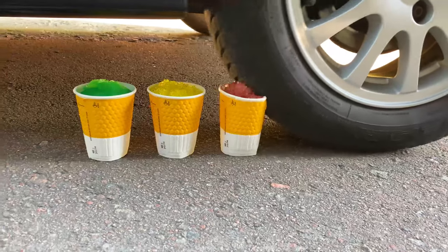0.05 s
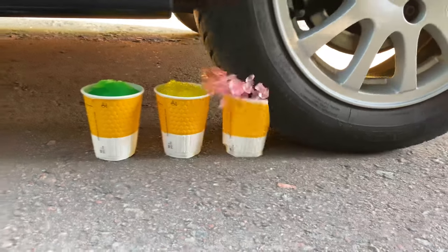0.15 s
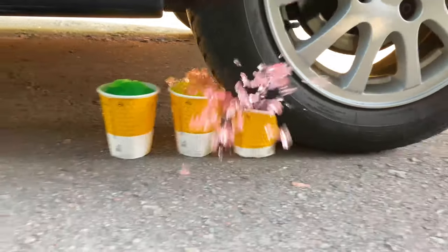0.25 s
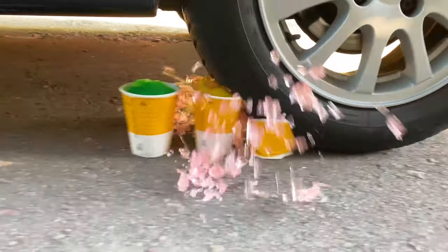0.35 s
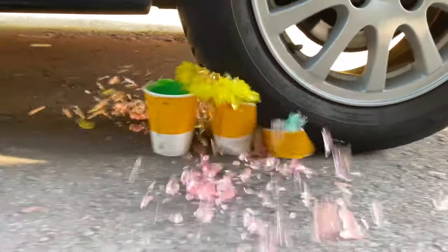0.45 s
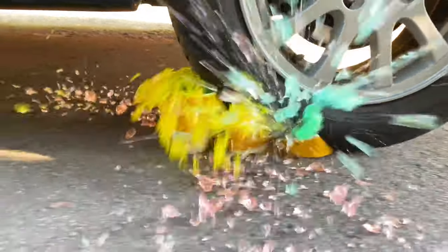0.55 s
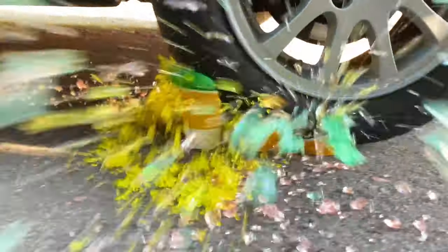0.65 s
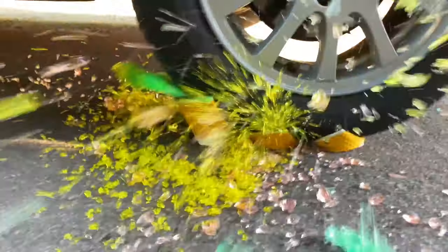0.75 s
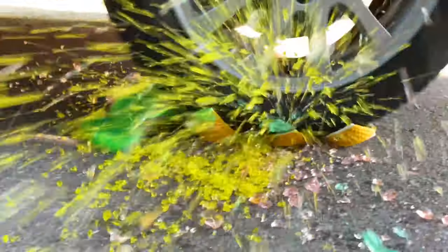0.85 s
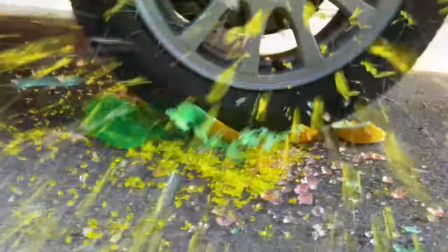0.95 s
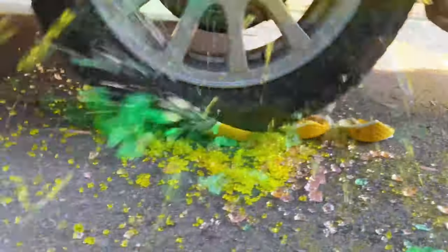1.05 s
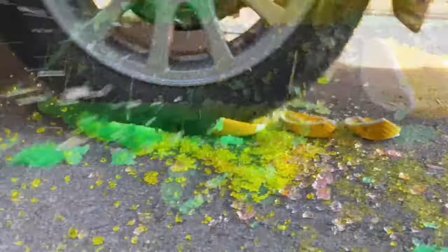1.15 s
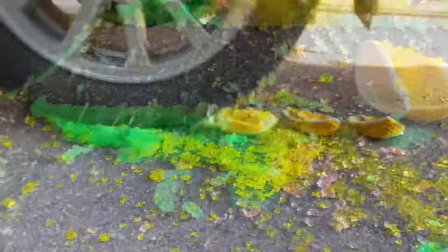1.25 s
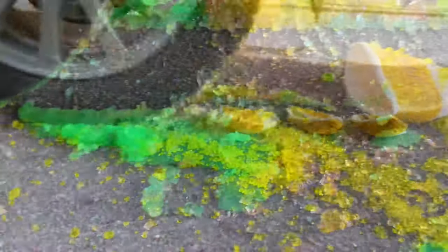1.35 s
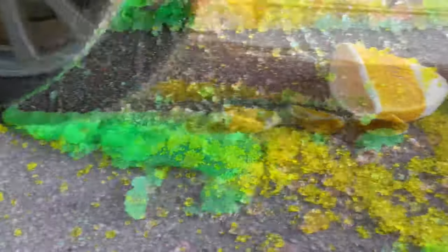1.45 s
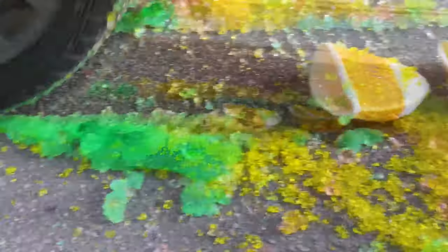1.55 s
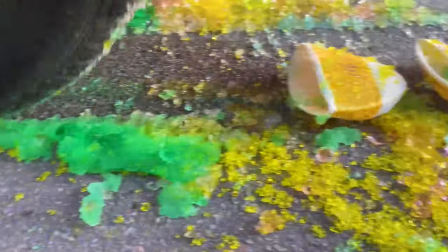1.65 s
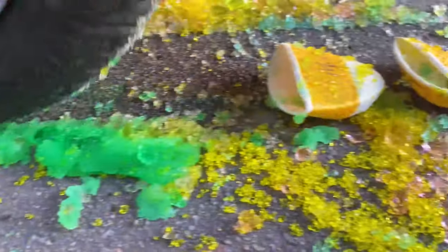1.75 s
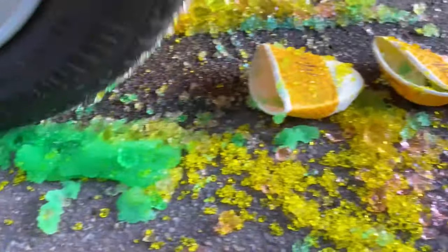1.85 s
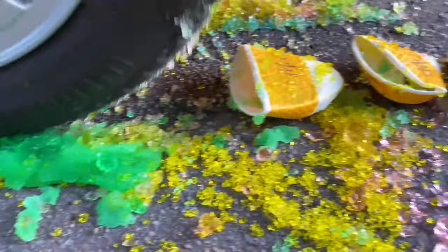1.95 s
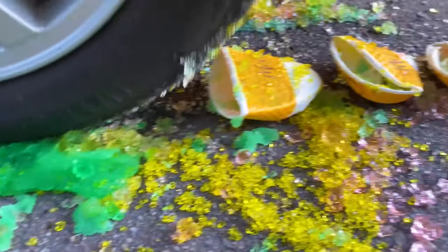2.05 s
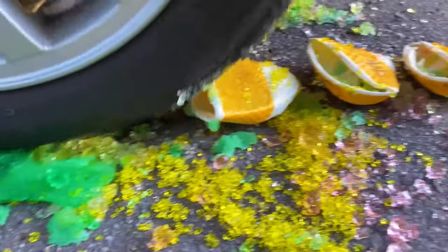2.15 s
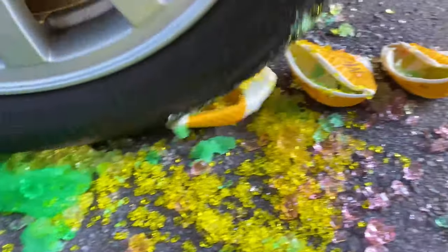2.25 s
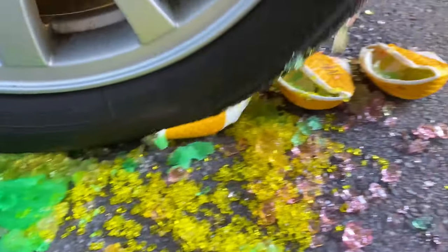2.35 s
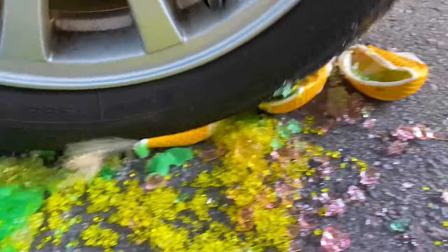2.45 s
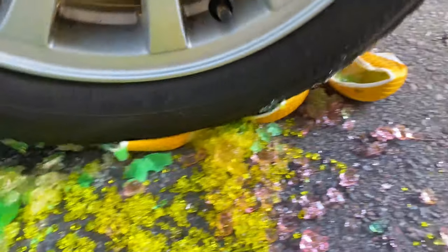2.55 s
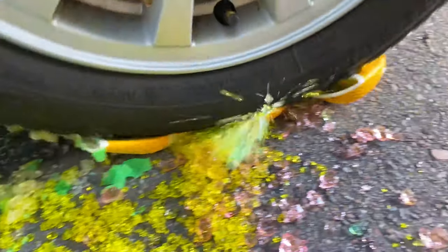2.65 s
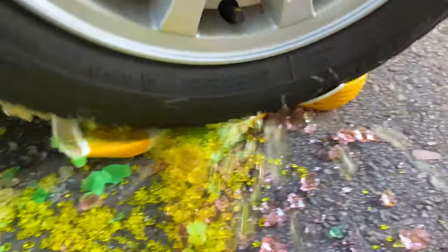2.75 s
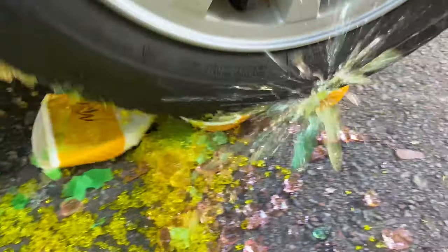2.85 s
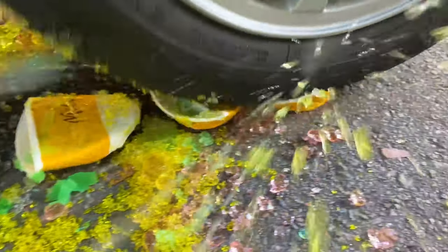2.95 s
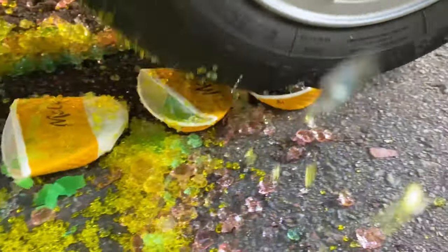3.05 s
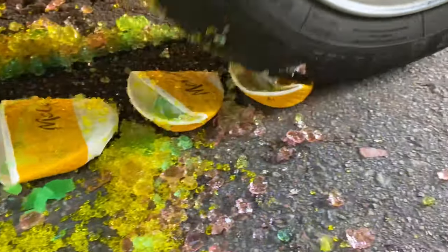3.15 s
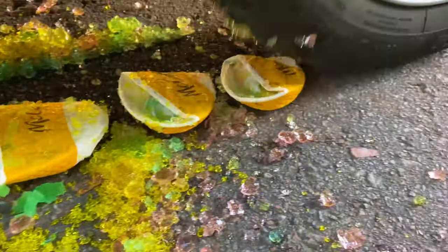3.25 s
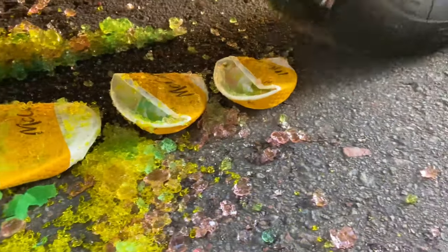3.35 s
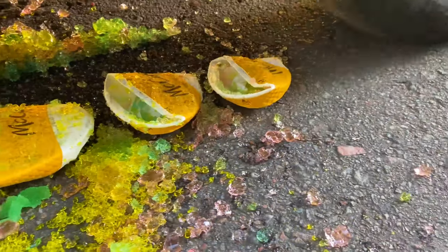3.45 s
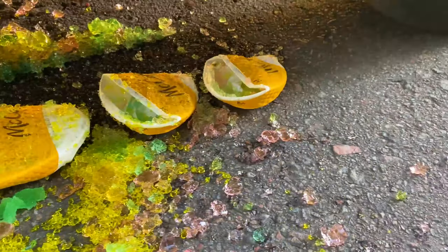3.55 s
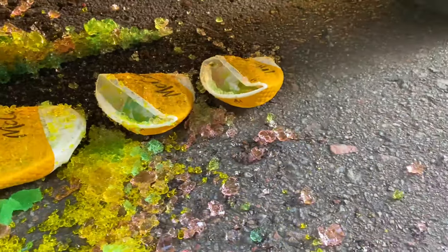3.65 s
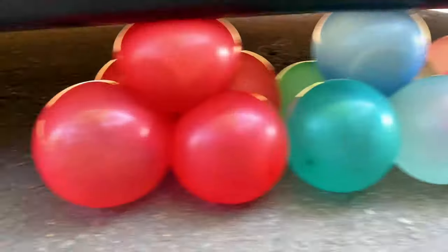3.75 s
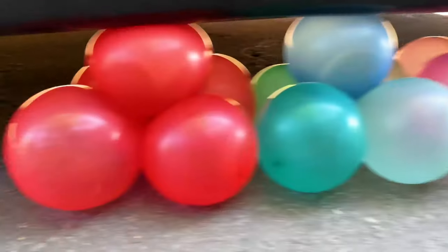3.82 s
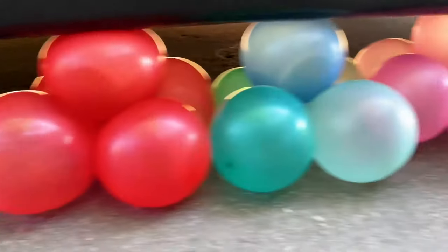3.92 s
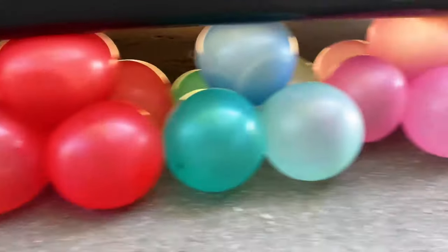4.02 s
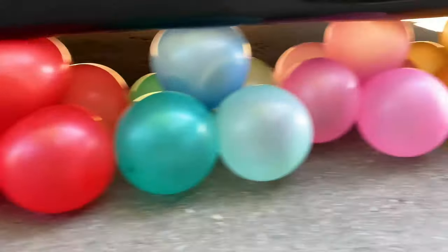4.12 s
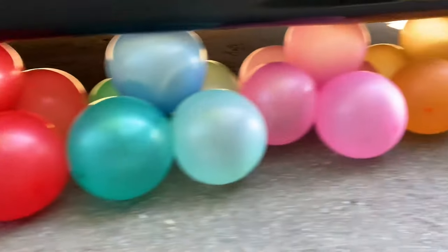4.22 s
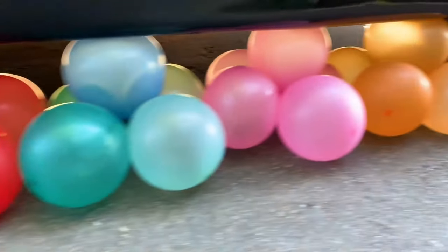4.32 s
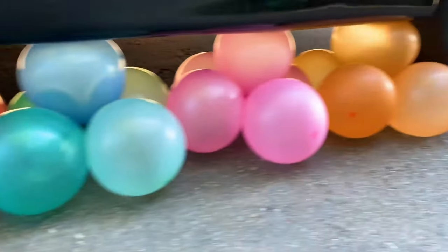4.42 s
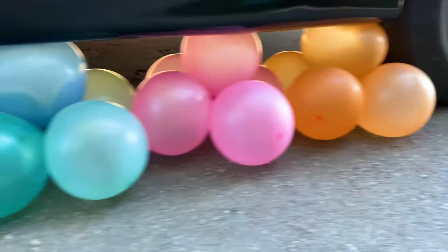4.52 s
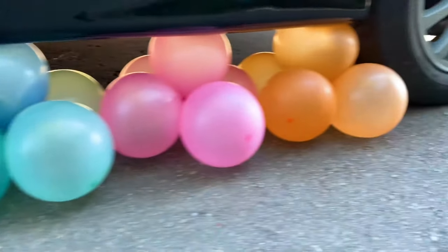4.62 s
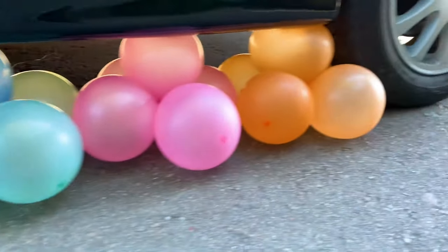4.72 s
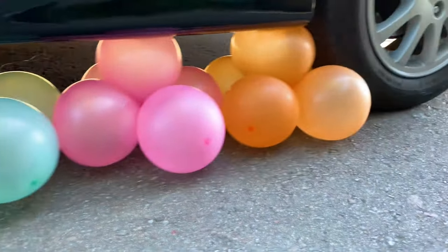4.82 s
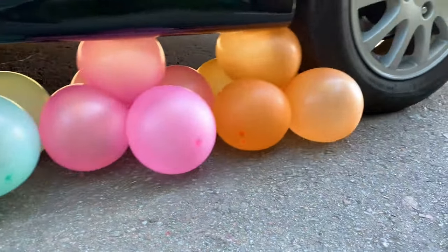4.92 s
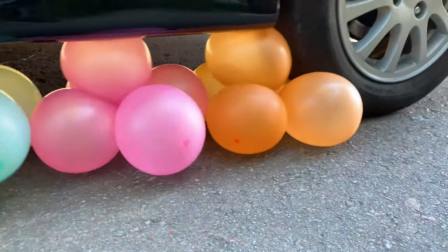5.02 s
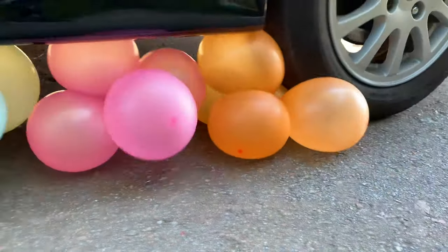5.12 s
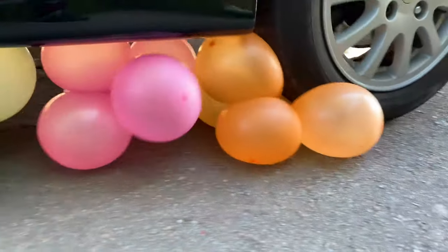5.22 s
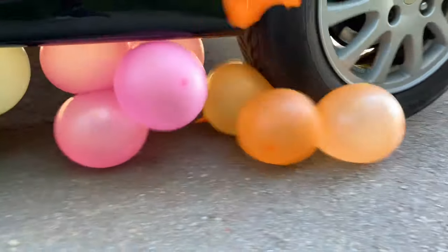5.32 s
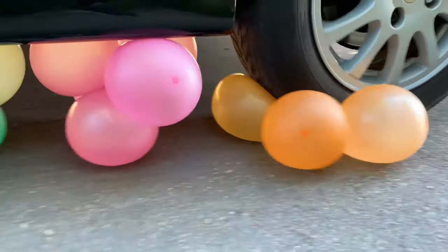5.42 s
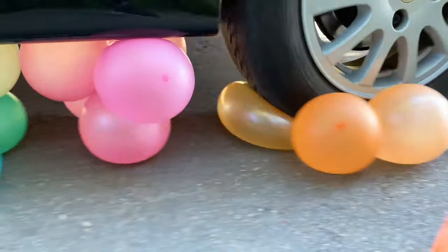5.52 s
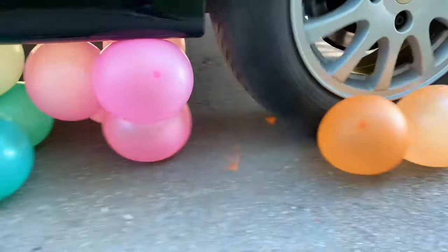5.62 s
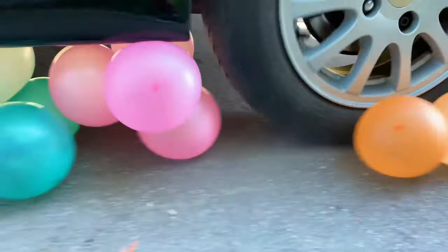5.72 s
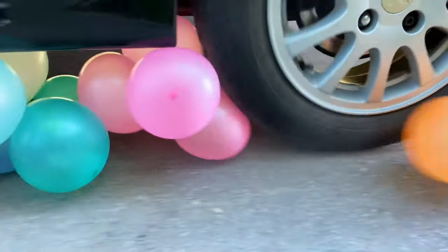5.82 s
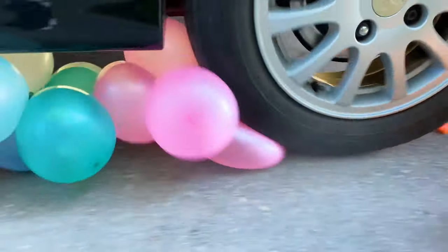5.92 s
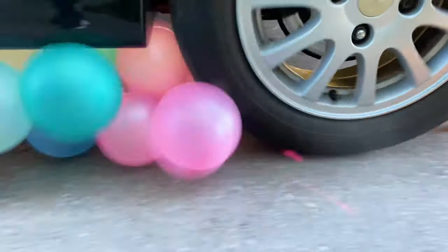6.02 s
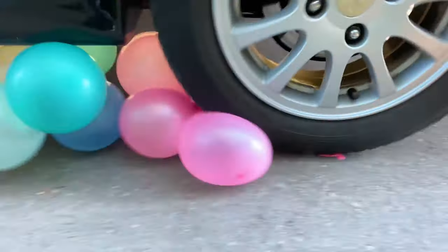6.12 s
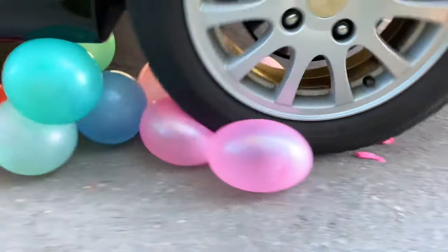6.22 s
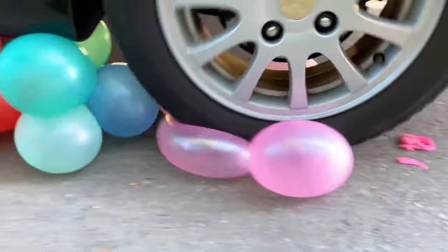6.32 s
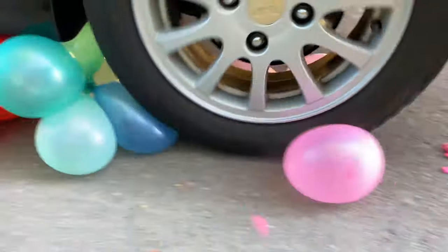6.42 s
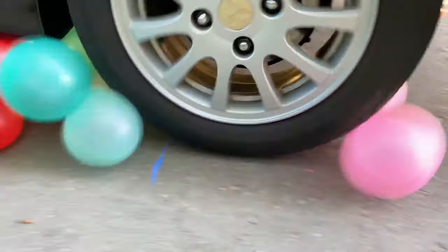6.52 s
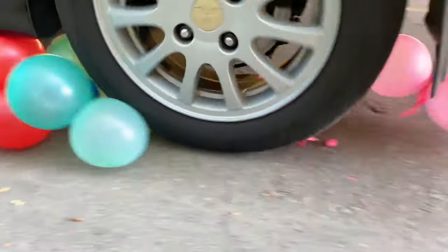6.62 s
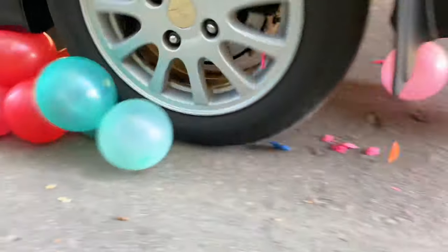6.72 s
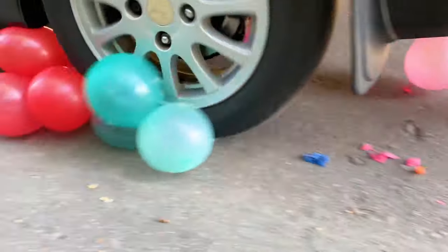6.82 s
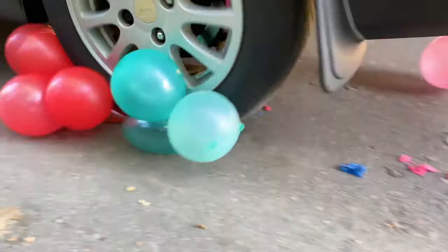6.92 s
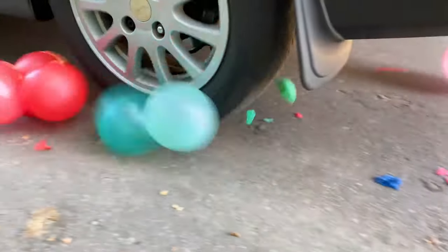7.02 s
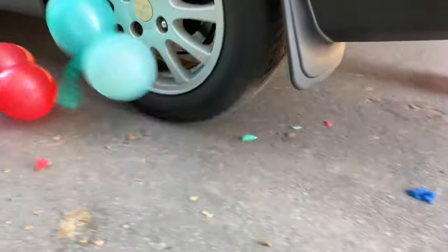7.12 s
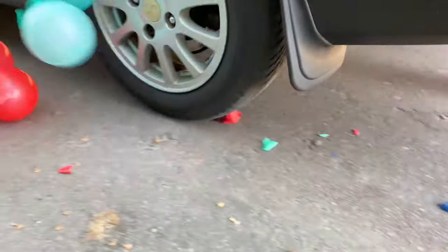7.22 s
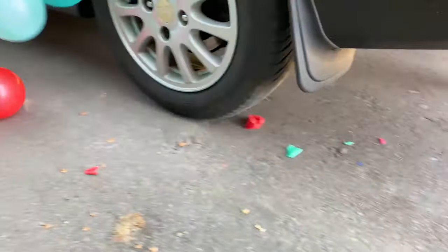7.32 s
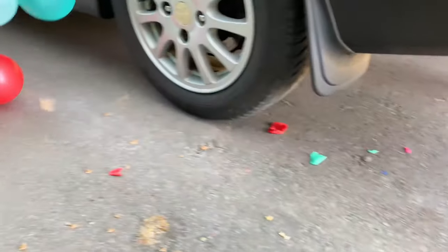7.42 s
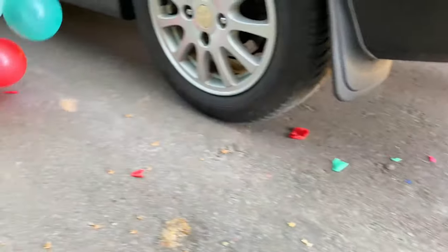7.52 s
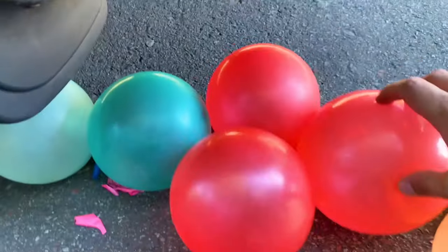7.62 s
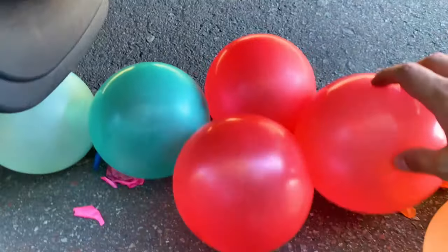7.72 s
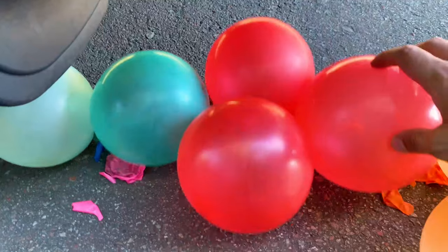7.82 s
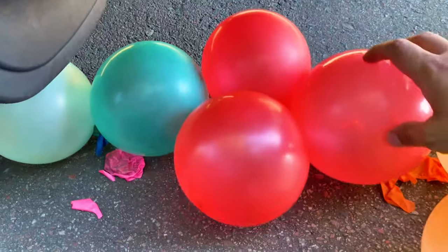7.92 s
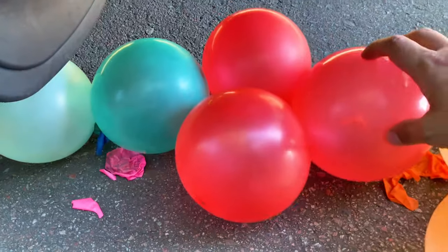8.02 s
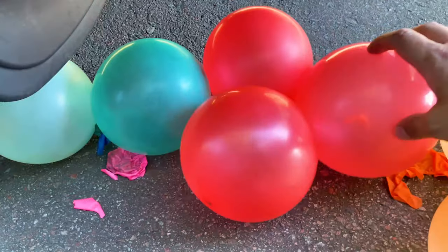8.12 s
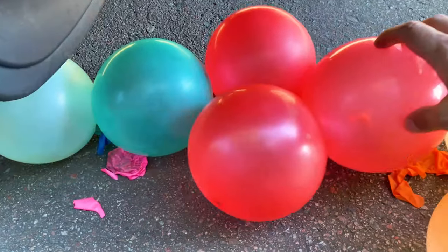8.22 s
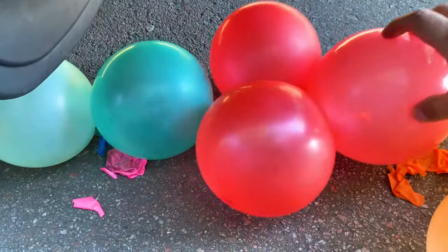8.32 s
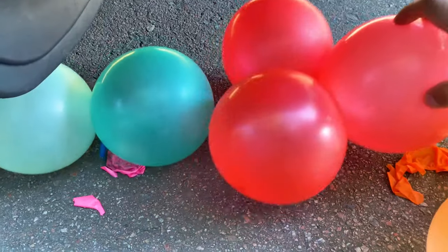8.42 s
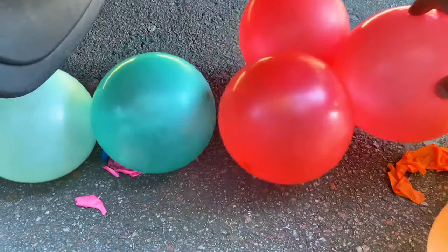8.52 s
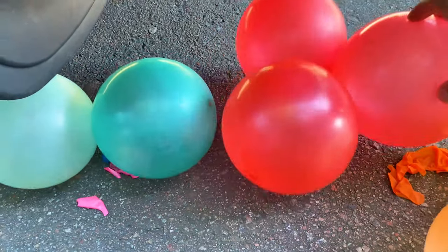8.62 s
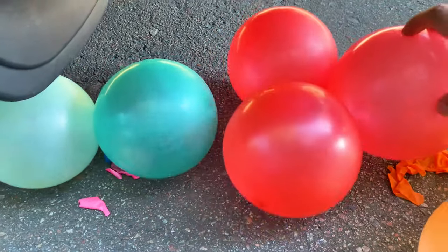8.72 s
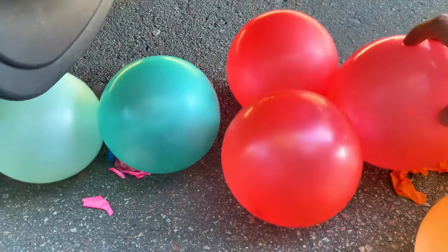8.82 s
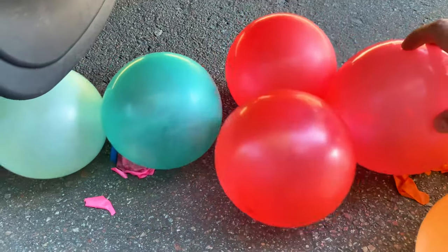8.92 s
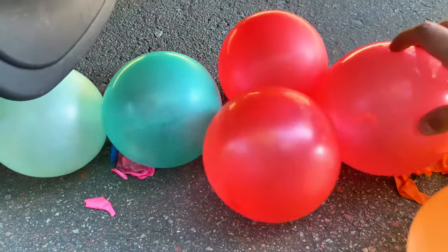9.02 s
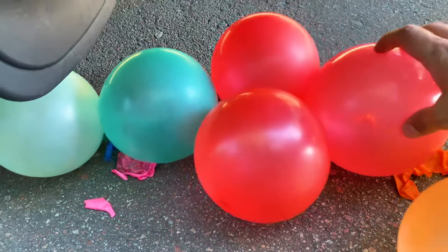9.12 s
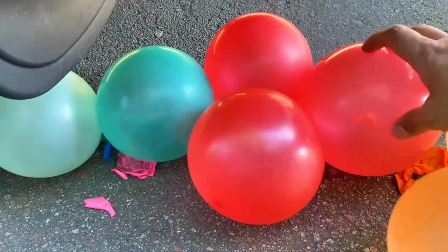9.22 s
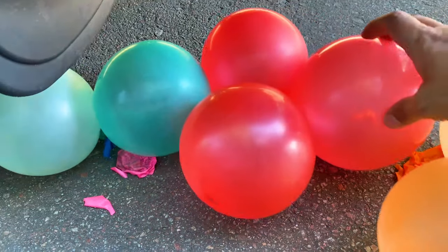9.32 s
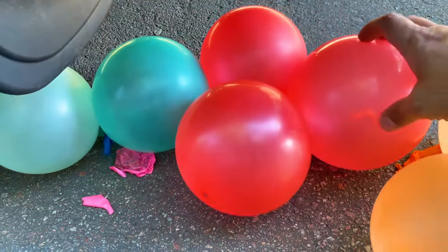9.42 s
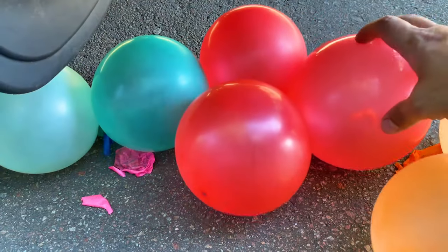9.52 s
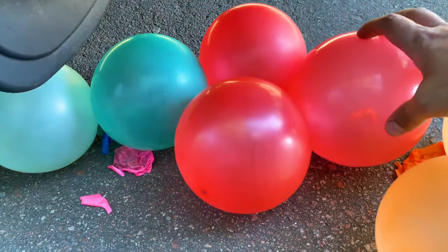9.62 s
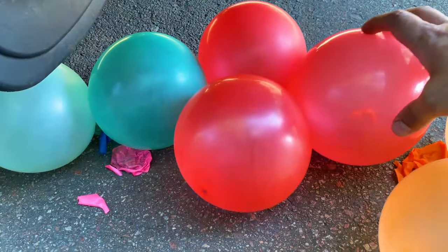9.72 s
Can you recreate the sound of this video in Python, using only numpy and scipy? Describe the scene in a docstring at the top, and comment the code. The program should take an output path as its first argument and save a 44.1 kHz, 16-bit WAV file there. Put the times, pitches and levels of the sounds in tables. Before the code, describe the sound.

Close to a slowly rolling car, cups crackle and flatten, balloons pop one after another with hard bangs, and a low engine idle remains.

```python
"""On asphalt, a phone held close to a creeping car. First its front tyre bursts full paper cups of wet granules,
and its rear tyre crunches them flat: crackle, wet pats and snaps from noise and short ringing grains.
From 3.8 s balloons squeak by stick and slip, drag under a tyre and burst one by one: cracks and air pulses.
From 7.6 s the engine idles, firing harmonics under machinery noise, while a hand holds the balloons left over."""
import sys
import numpy as np
from scipy import signal
from scipy.fft import rfft, irfft, next_fast_len
from scipy.io import wavfile

SR = 44100
rng = np.random.default_rng(int(sys.argv[2]) if len(sys.argv) > 2 else 0)


def transcribe(u):
    """Save the signal u as a 16-bit wav file named by the first command-line argument.

    u: samples, shape (n,) or (channels, n), limited to [-1, 1]; the rate is SR.
    q: integer samples, one column per channel.
    """
    v = np.clip(np.atleast_2d(u).T, -1, 1)
    q = np.round(v * 32767).astype(np.int16)
    wavfile.write(sys.argv[1], SR, q)


N = 430416
T = np.arange(N) / SR


def amp(db):
    """Turns decibels into amplitude."""
    return 10 ** (np.asarray(db) / 20)


def unit(x):
    """Scales x to rms 1."""
    return x / np.sqrt(np.mean(x ** 2) + 1e-20)


def read(points, hz):
    """A spectrum's value at hz, on a log-frequency axis."""
    f, value = np.transpose(points)
    return np.interp(np.log(hz + 1), np.log(f + 1), value)


def add(mix, s, sound):
    """Mixes a sound in at time s."""
    part = mix[:, round(s * SR):][:, :sound.shape[-1]]
    part += sound[..., :part.shape[1]]


def span(start, end):
    """The sample times between two moments."""
    return np.arange(round(start * SR), round(end * SR)) / SR


def hold(t, s, length, attack_s, release_s):
    """Swells up to time s, holds for length, dies away."""
    rising = np.minimum(t - s, 0) / attack_s
    falling = np.maximum(t - s - length, 0) / release_s
    return np.exp(rising - falling)


def colour(x, spectrum, treble_db=0):
    """Gives x a spectrum, with a shelf on the treble; rms 1."""
    size = next_fast_len(x.shape[-1])
    hz = np.fft.rfftfreq(size, 1 / SR)
    shelf = hz ** 2 / (hz ** 2 + 3500 ** 2)
    gain = amp(read(spectrum, hz) + treble_db * shelf)
    return unit(irfft(rfft(x, size) * gain, size)[..., :x.shape[-1]])


def noise(spectrum, size=N, treble_db=0):
    """Two unrelated coloured noises."""
    return colour(rng.standard_normal((2, size)), spectrum, treble_db)


def drift(hz, size=N):
    """Random wander of rms about 1, with hz new values a second."""
    knots = rng.standard_normal(8192)
    return 1.3 * np.interp(np.arange(size) / SR * hz, np.arange(len(knots)), knots)


def band(hz, width_hz):
    """Two unrelated noises in one narrow resonance; rms 1."""
    f = np.fft.rfftfreq(N, 1 / SR)
    resonance = 1 / (1 + ((f - hz) / width_hz) ** 2)
    return unit(irfft(rfft(rng.standard_normal((2, N))) * resonance, N))


def crackle(size, spectrum, per_s, spread_db, wash):
    """Tiny fractures of very unequal size, each ringing briefly at its own pitch, over a wash."""
    t = np.arange(1024) / SR
    hz = np.geomspace(120, 15000, 24)[:, None]
    shape = (len(hz), size)
    struck = rng.random(shape) < per_s / len(hz) / SR
    clicks = struck * amp(spread_db * np.minimum(rng.exponential(1, shape), 3.5))
    signed_clicks = clicks * rng.choice([-1, 1], (2, *shape))
    rings = np.exp(-t * hz / 0.87) * np.cos(2 * np.pi * hz * t) * hz
    grains = signal.fftconvolve(signed_clicks, rings[None], axes=2).sum(1)[:, :size]
    return colour(unit(grains) + wash * rng.standard_normal((2, size)), spectrum)


def squeeze(low, high, body, fizz, per_s, spread_db):
    """Coarse and fine crackle under the tread, on the envelopes low and high, both surging as the load slips."""
    size = len(low)
    coarse = low * crackle(size, body, per_s, spread_db, wash=0.4)
    fine = high * crackle(size, fizz, 2 * per_s, spread_db, wash=0.44)
    surge = amp(2.3 * drift(140, size))
    return (coarse + fine) * surge * signal.windows.tukey(size, .03)


def street(x):
    """A faint, bright echo from the walls around: sound convolved with a decaying noise tail."""
    t = np.arange(32768) / SR
    walls = [(60, -2.5), (500, -11.0), (3000, -6.0), (8000, 0.0), (15000, -17.0)]  # pitch_hz, level_db
    tail = noise(walls, len(t)) * amp(-60 * t / 0.27) * (1 - np.exp(-t / 0.019))
    return amp(-25.5) * signal.fftconvolve(x[:1], tail / np.linalg.norm(tail[0]), axes=1)[:, :N]


def echoes(x):
    """Road, tyre and sill each throw the sound back once; the path lengths wander."""
    out = x.copy()
    for delay_s, gain in [(.0013, 0.089), (.0037, 0.17), (.0061, .22)]:
        earlier = T - delay_s * (1 + .15 * drift(3))
        out += gain * np.array([np.interp(earlier, T, channel) for channel in x])
    return out


# Moments that part the cups, the balloons and the idling: start_s
PART_STARTS = [3.838, 7.643]
# The three parts: hiss_db against the machinery before a common lift, whine_db against the machinery,
# rumble_db against the exhaust at or below idle speed
PART_LEVELS = [(-11, -28, -4.5), (-12.5, -23, -11), (-17, -18.5, -7)]
# Level of the car sound, dropping after loud bursts and partly recovering: time_s, exhaust_db, machinery_db
CAR_LEVELS = [(0, -39, -41), (1.27, -42, -48.5), (1.7, -37, -47.5), (2.3, -39.5, -40), (3.1, -40.5, -45),
              (3.75, -42, -44.5), (3.95, -44.5, -46), (4.8, -35.5, -44.5), (5.5, -45, -48),
              (5.72, -59.5, -56.5), (5.9, -48.5, -49.5), (6.22, -59, -55.5), (6.88, -47, -50),
              (7.3, -62.5, -63.5), (7.63, -65, -74.5)]
# Engine speed, the throttle pressed once for the cups and once for the balloons: time_s, firings_hz
ENGINE_SPEED = [(0, 22.3), (1.25, 29.2), (1.55, 36.1), (1.95, 38.6), (2.3, 28), (3.05, 26.3), (3.75, 24.2),
                (4.3, 23), (4.55, 26), (5.4, 27.6), (7.3, 22.6)]
# Spectra of exhaust harmonics, rumble, machinery and hiss: pitch_hz, level_db
EXHAUST_SPECTRUM = [(25, -7.5), (50, 0), (76, 4), (105, -3.5), (120, -11.5), (138, -1), (160, -4),
                    (190, -11.5), (400, -16.5)]
RUMBLE_SPECTRUM = [(15, -22), (45, -11.5), (90, 0.5), (160, -3.5), (500, -23.5), (1500, -71)]
MACHINERY_SPECTRUM = [(100, -14), (250, 0), (420, 4), (600, -2), (850, -5), (1100, -4.5), (1520, -11.5),
                      (1800, -12), (3000, -19.5), (5000, -63), (16000, -57)]
HISS_SPECTRUM = [(800, -26.5), (2400, 5), (3600, 1.5), (4500, 1.5), (5400, -2), (8000, 0.5), (10000, -0.5),
                 (12000, -12.5), (15500, -0.5)]
# Panels humming along with the engine: pitch_hz, width_hz, level_db against the machinery
PANELS = [(263, 5.9, -17.5), (585.5, 23, -13.5)]
IDLE_FIRINGS_HZ, IDLE_EXHAUST_DB, IDLE_MACHINERY_DB = 26.9, -37.5, -48
WHIRR_DB, WHIRR_DB_PER_FIRING = -52.5, 0.54  # level at idle speed, and its growth with the revs


def engine():
    """Firing pulses boom in the exhaust and beat time in the machinery noise; returns (drone, noises)."""
    hiss_db, whine_db, rumble_db = np.array(PART_LEVELS)[np.searchsorted(PART_STARTS, T)].T
    idling = T > PART_STARTS[1]
    firing_hz = np.where(idling, IDLE_FIRINGS_HZ, np.interp(T, *np.transpose(ENGINE_SPEED)))
    rev = firing_hz - IDLE_FIRINGS_HZ
    s, exhaust_db, machinery_db = np.transpose(CAR_LEVELS)
    exhaust = amp(np.where(idling, IDLE_EXHAUST_DB, np.interp(T, s, exhaust_db)))
    machinery = amp(np.where(idling, IDLE_MACHINERY_DB, np.interp(T, s, machinery_db)))

    # twelve harmonics of a slightly unsteady firing rate
    turns = 2 * np.pi * np.cumsum(firing_hz * (1 + .003 * drift(13))) / SR
    harmonics = 0
    for k in np.arange(12) + 1:
        phase = 2 * np.pi * rng.random()
        harmonics = harmonics + amp(read(EXHAUST_SPECTRUM, k * firing_hz)) * np.cos(k * turns + phase)
    drone = exhaust * unit(harmonics) * amp(1.3 * drift(12))
    beat = 1 + 0.13 * np.cos(turns) + 0.069 * np.cos(turns / 2)

    # the rumble weakens against the exhaust as the revs rise
    rumble = amp(rumble_db - 0.5 * np.maximum(rev, 0)) * exhaust * noise(RUMBLE_SPECTRUM)
    clatter = amp(-0.5) * machinery * beat * noise(MACHINERY_SPECTRUM) * amp(1.0 * drift(25))
    hiss = amp(hiss_db + 7.5) * machinery * noise(HISS_SPECTRUM) * amp(1.0 * drift(60))
    hums = machinery * sum(amp(db) * band(hz, width_hz) for hz, width_hz, db in PANELS)
    # at idle a light metallic flutter rides on the firing
    flutter = amp(-60.5) * idling * beat ** 2 * band(1475, 100)
    noises = rumble + clatter + hiss + hums + flutter

    # a thin electric whine
    whine = amp(whine_db) * machinery * band(8760, 22)[0]
    # at idle a second low hum beats against the exhaust
    throb = amp(-45.5) * idling * band(73.7, 1.7)[0]
    # during the cups, belt and fan whirr all around and grow with the revs
    whirr = amp(WHIRR_DB + WHIRR_DB_PER_FIRING * rev) * (T < PART_STARTS[0]) * band(1380, 210)
    return drone + throb + whirr + whine, noises


# Stones caught in the tread: start_s, level_db
TREAD_STONES = [(1.829, -33), (2.055, -32), (3.486, -40)]
# Bright spray, of stones here and of crushed cups below: pitch_hz, level_db
SPRAY_SPECTRUM = [(800, -37.5), (3000, -12), (4000, -7), (4800, -1.5), (6500, -1), (9500, 2.5),
                  (12000, -0.5), (15500, 3.5)]


def grit():
    """Small stones tick as the tread lets them go: short decaying bright noise."""
    out, t = np.zeros((2, N)), np.arange(2048) / SR
    for s, db in TREAD_STONES:
        add(out, s, amp(db) * np.exp(-t / 0.0033) * noise(SPRAY_SPECTRUM, len(t)))
    return out


# Hollow knocks and booms of tyre, cups and balloons: start_s, level_db, pitch_hz, t60_s
KNOCKS = [(0.469, -22, 86.5, 0.22), (.752, -28, 250, 0.22), (.9, -29, 240.5, 0.65), (.96, -22, 66, 0.27),
          (2.495, -21, 423, 0.066), (2.711, -21, 604, 0.028), (3.009, -24.5, 230, 0.047),
          (4.977, -18, 300, 0.09), (5.179, -19.5, 526, .06), (5.27, -18.5, 1156, 0.037),
          (6.392, -12.5, 754, 0.052), (6.405, -9.5, 61, 0.14), (8.503, -19.5, 94.4, 0.12)]


def thumps():
    """Damped swings of the tyre wall, the cups and whole balloons."""
    out, t = np.zeros((2, N)), np.arange(16384) / SR
    for s, db, hz, t60 in KNOCKS:
        rise = 1 - np.exp(-t * hz / 0.57)
        add(out, s, amp(db - 60 * t / t60) * rise * np.sin(2 * np.pi * hz * t))
    return out


# Flung granules raining back on the asphalt: pitch_hz, level_db
GRANULE_SPECTRUM = [(200, -10.5), (900, 2), (2600, 5.5), (4000, -3.5), (7000, -8.5), (10000, -14),
                    (15500, -11)]
SPLAT_START_S, SPLAT_LENGTH_S, SPLAT_DB = 0.358, 0.586, -34
GRANULE_START_S, GRANULE_LENGTH_S, GRANULE_DB, GRANULE_SETTLE_S = 0.6, 0.64, -48, 0.1


def splats():
    """Wet lumps of filling land in soft pats while the full cups burst; loose granules patter down for longer."""
    out, t = np.zeros((2, N)), span(.2, 1.7)
    # pitch_hz, level_db
    wet = [(50, -2.5), (140, -2.0), (350, 2.0), (600, -3.5), (1200, -6.5), (5000, -55)]
    pats = crackle(len(t), wet, per_s=700, spread_db=3.5, wash=0.37)
    falling = hold(t, SPLAT_START_S, SPLAT_LENGTH_S, attack_s=0.021, release_s=0.079)
    add(out, t[0], amp(SPLAT_DB) * falling * pats)
    patter = crackle(len(t), GRANULE_SPECTRUM, per_s=1000, spread_db=5, wash=0.47)
    raining = hold(t, GRANULE_START_S, GRANULE_LENGTH_S, attack_s=0.081, release_s=GRANULE_SETTLE_S)
    add(out, t[0], amp(GRANULE_DB) * raining * patter)
    return out


YIELD_DB_PER_S = 69.5  # a crush weakens as the cup gives way


def load(t, tread, crushes, attack_s, release_s):
    """Envelopes of crumpling and spray: the tread's steady grind plus a surge for every crush."""
    start, lasts, crumple_db, spray_db, rise_s, fall_s = tread
    both = amp([[crumple_db], [spray_db]]) * hold(t, start, lasts, rise_s, fall_s)
    for s, length, crumple_db, spray_db in crushes:
        yielding = amp(-YIELD_DB_PER_S * np.clip(t - s, 0, length))
        both = both + amp([[crumple_db], [spray_db]]) * yielding * hold(t, s, length, attack_s, release_s)
    return both


# Each tyre grinding over spilt granules and paper:
# start_s, length_s, crumpling_db, spray_db, attack_s, release_s
FRONT_GRIND = (0.29, 0.76, -39.5, -34, 0.22, 0.05)
REAR_GRIND = (2.442, .575, -45.5, -39, .006, .01)
# Full cups giving way in lurches under the front tyre, then empty ones flattened by the rear tyre:
# start_s, length_s, crumpling_db, spray_db
FULL_LURCHES = [(0.357, 0.076, -36.5, -32.5), (0.459, 0.082, -35.5, -35.5), (0.579, 0.13, -30.5, -28),
                (0.729, 0.033, -28, -28.5), (0.831, 0.0071, -30, -24.5)]
FLAT_LURCHES = [(2.452, 0.036, -35, -29), (2.494, 0.023, -30.5, -23), (2.672, 0.049, -24.5, -21),
                (2.871, 0.074, -23.5, -14.5)]
# Ring of the crumpling walls, full and flattened: pitch_hz, level_db
FULL_WALL = [(30, -20), (90, 14), (330, 3.5), (700, 0.5), (1400, 3), (2800, 5.5), (3800, -1), (6000, -15.5),
             (16000, -58.5)]
FLAT_WALL = [(60, -2.5), (300, -0.5), (700, -1.5), (1600, 3.5), (2200, -2), (2800, 0.5), (3900, -22),
             (6000, -31.5), (16000, -61.5)]
# Cup walls buckling: start_s, level_db, treble_db
WALL_SNAPS = [(0.073, -18.5, -29), (0.281, -10.5, -6), (0.347, -12, -14), (0.356, -14, -16),
              (0.391, -10, 1), (.417, -16, -14), (.483, -13, -20.5), (.559, -17, -19), (0.58, -8.5, -19.5),
              (0.7035, -3, -20), (0.718, -15, -18), (0.7635, -14, -15), (0.83, -10.5, -12.5),
              (0.898, -18, -26.5), (0.924, -13.5, -24), (1.022, -12, -0.5), (1.113, -18.5, -26),
              (2.409, -11, -0.5), (2.419, -4.5, 2), (2.51, -8, -17), (2.667, -9.5, -12),
              (2.683, -7.5, -24.5), (2.737, -12, -8), (2.868, -7, -9.5), (2.886, -1, -15),
              (2.904, -5, -14.5), (2.923, -7, -11.5), (2.952, -7, -14), (2.987, -14, -14)]
# Spectrum of a snap: pitch_hz, level_db
SNAP_SPECTRUM = [(60, -14.5), (400, -7), (1200, -2), (1800, 0.5), (2800, 2.5), (3900, -8.5), (5500, 0.5),
                 (9000, 1), (15500, -4.5)]
FULL_ATTACK_S, FULL_RELEASE_S, FLAT_ATTACK_S, FLAT_RELEASE_S = 0.0093, 0.0088, .011, 0.011
SNAP_S, SNAP_DOUBLING_DB = 0.00067, 12.5  # decay at treble 0 dB; it doubles with each such step towards dull


def cups():
    """The front tyre bursts the full cups; the rear one crunches them flat and dry. Their walls give way with snaps."""
    out, t = np.zeros((2, N)), np.arange(2048) / SR
    front, rear = span(0, 1.4), span(2.35, 3.1)
    full = load(front, FRONT_GRIND, FULL_LURCHES, FULL_ATTACK_S, FULL_RELEASE_S)
    flat = load(rear, REAR_GRIND, FLAT_LURCHES, FLAT_ATTACK_S, FLAT_RELEASE_S)
    add(out, front[0], squeeze(*full, FULL_WALL, SPRAY_SPECTRUM, per_s=1600, spread_db=5.3))
    add(out, rear[0], squeeze(*flat, FLAT_WALL, SPRAY_SPECTRUM, per_s=3000, spread_db=4.5))
    for s, db, treble_db in WALL_SNAPS:
        length = SNAP_S * 2 ** (-treble_db / SNAP_DOUBLING_DB)
        decay = np.exp(-t / length) + 0.14 * np.exp(-t / (6 * length))
        burst = (1 - np.exp(-t / 0.00071)) * decay * noise(SNAP_SPECTRUM, len(t), treble_db)
        # the wall flips through in one sharp swing, slower in dull snaps
        cycles = np.maximum(t - .001, 0) * 4.2 / length
        sides = [[1], [rng.uniform(-1, 1)]]
        swing = np.exp(-cycles) * np.sin(2 * np.pi * cycles) * sides
        add(out, s, amp(db) * (0.64 * swing + 0.62 * burst))
    return out


# Ring of a squeaking balloon skin: pitch_hz, level_db
SKIN_SPECTRUM = [(900, -22), (2250, 2), (2700, -2.5), (4700, -5.5), (5100, -16), (12000, -37)]


def squeak(size, slip_hz=588):
    """Uneven slips flick a taut skin: a wandering click train and noise, coloured by the skin."""
    turns = np.cumsum(slip_hz * (1 + .018 * drift(400, size))) / SR
    slips = unit(np.diff(np.floor(turns), prepend=0))
    rough = .35 * rng.standard_normal((2, size))
    return colour(slips + rough, SKIN_SPECTRUM) * signal.windows.tukey(size, .4)


# Balloon skins squeaking: start_s, length_s, level_db
SKIN_SQUEAKS = [(4.192, .03, -43), (4.247, .016, -41), (4.295, 0.014, -40.5), (4.326, .032, -42.5),
                (4.365, 0.079, -46)]
# Light bumps with a hollow ring: start_s, level_db, brightness_db
HOLLOW_BUMPS = [(2.22, -31.5, -3), (4.935, -29, 13), (4.978, -28, -28), (5.126, -26, 10), (5.16, -20, 10.5),
                (5.18, -15.5, -3.5), (5.271, -21.5, -10), (5.29, -24.5, -2), (5.827, -36.5, 6),
                (9.292, -28, -16), (9.579, -38, -13)]
# Hollow ring of a bump: pitch_hz, level_db, t60_s
HOLLOW_MODES = [(180.6, -7.5, 0.33), (340, -4, 0.063), (610, -19.5, .12), (1190, -12, .06)]
# Coarse and fine rubbing under the tread: pitch_hz, level_db
RUB_COARSE = [(40, 8), (350, 11), (700, -1.5), (2000, -2.5), (3000, -16), (5000, -30), (16000, -64)]
RUB_FINE = [(800, -26), (3000, -5.5), (5000, -6), (7500, -2), (10000, -4.5), (12000, -3), (15500, -2)]
# Noise of the bumps, and of the ring under the car below: pitch_hz, level_db
UNDERBODY_SPECTRUM = [(30, -11.5), (100, 2), (330, 2), (540, 2.5), (850, 1.5), (1400, -6), (2800, -10),
                      (5000, -13.5), (9000, -11.5), (15500, -19.5)]
# the first balloon is dragged ever harder, and strains just before it bursts
DRAG_START_S, DRAG_SCRAPE_DB, DRAG_FIZZ_DB, DRAG_DB_PER_S = 4.865, -43.5, -40, 21.5
STRAIN_DB, STRAIN_S = -16, 0.013


def rubbing():
    """Balloons drag under the tread and squeak by stick and slip; light bumps ring hollow."""
    out, t = np.zeros((2, N)), np.arange(8192) / SR
    drag = span(DRAG_START_S, BALLOON_POPS[0][0])
    onset = 1 - np.exp((drag[0] - drag) / 0.011)
    grip = amp(DRAG_DB_PER_S * (drag - drag[0])) * onset * amp(0.66 * drift(22.0, len(drag)))
    strain = amp(STRAIN_DB) * np.exp((drag - drag[-1]) / STRAIN_S)
    scrape = amp(DRAG_SCRAPE_DB) * grip + 0.4 * strain
    fizz = amp(DRAG_FIZZ_DB) * grip + strain
    add(out, drag[0], squeeze(scrape, fizz, RUB_COARSE, RUB_FINE, per_s=2000, spread_db=2.5))
    ring = sum(amp(db - 60 * t / t60) * np.sin(2 * np.pi * hz * t) for hz, db, t60 in HOLLOW_MODES)
    for s, db, bright_db in HOLLOW_BUMPS:
        pat = np.exp(-t / 0.0092) * noise(UNDERBODY_SPECTRUM, len(t), bright_db)
        add(out, s, amp(db) * (1 - np.exp(-t / 0.0013)) * (pat + 0.61 * ring))
    for s, length, db in SKIN_SQUEAKS:
        add(out, s, amp(db) * squeak(round(length * SR)))
    return out


# Ring time under the car: pitch_hz, t60_s
UNDERBODY_RING = [(80, 0.3), (260, 0.19), (700, 0.12), (1800, 0.1), (5000, 0.13), (15000, 0.07)]


def underbody(size):
    """Dense echoes between road and floor pan: noise whose bass lasts longest."""
    hz, t, z = signal.stft(noise(UNDERBODY_SPECTRUM, size), SR, nperseg=256)
    decay = amp(-60 * t / read(UNDERBODY_RING, hz)[:, None])
    return signal.istft(z * decay, SR, nperseg=256)[1][:, :size]


# Balloons bursting close by: start_s, crack_db, air_db, first_pitch_hz (60 Hz is added to it),
# decay in periods of that pitch, bounce_delay_s off the car, note_hz, note_db, ring_db under the car,
# tear_db, boom_db
BALLOON_POPS = [(5.3308, -5, -1.5, 1150, 11, 0.0077, 834, -14, -14.5, -15.5, -14),
                (5.6066, -13, -6.5, 1880, 11.1, 0.0059, 770, -11, -24, -15.5, -19.5),
                (6.069, -12, -1.5, 1515, 4.2, .0044, 760, -15, -23, -18.5, -25),
                (6.388, -13.5, -2.5, 1926, 2.5, 0.0048, 880, -13.5, -15, -23.5, -34),
                (6.524, -15, -25, 1445, 11, 0.0058, 460, -14, -18, -39, -38),
                (6.565, -8, -10.5, 3720, 18, 0.003, 643, -11, -19.5, -43.5, -45),
                (6.715, -10.5, -7.5, 1320, 8.8, 0.005, 657, -12, -16, -34, -40),
                (6.9758, -20.5, -17, 784, 16.3, 0.0076, 400, -18.5, -23.5, -49, -41),
                (6.9937, -9.5, -26, 1190, 15, 0.0023, 1105, -18.5, -15.5, -46, -36.5),
                (7.0364, -9, -6, 1294, 5.3, 0.0029, 764, -18, -24.5, -27.5, -36.5)]
# Spectrum of cracking and tearing skin: pitch_hz, level_db
CRACK_SPECTRUM = [(100, -33), (500, 4), (1000, -1), (1600, -3), (2800, -2), (4200, -8.5), (6000, -8.5),
                  (10000, -18), (15500, -14)]
NOTE_T60_S = 0.055
BOUNCE_GAIN, BOUNCE_SKEW = 0.4, 0.019  # skew: share of the delay by which left and right are each off
BOOM_HZ, BOOM_T60_S, BOOM_DELAY_S = 60.6, 0.17, .004
BOOM_SAG_HZ, BOOM_SAG_S = 45, 0.011  # the boom starts this much higher and sinks


def bursts():
    """Skin tears and cracks; freed air swings ever more slowly, bounces, rings, booms. Returns (air, noises)."""
    air, out, t = np.zeros((2, N)), np.zeros((2, N)), np.arange(16384) / SR
    lead = np.arange(-1024, 0) / SR
    rise = 1 - np.exp(-t / 0.00022)
    boom_hz = BOOM_HZ + BOOM_SAG_HZ * np.exp(-t / BOOM_SAG_S)
    boom = amp(-60 * t / BOOM_T60_S) * np.sin(2 * np.pi * np.cumsum(boom_hz) / SR)
    for (s, crack_db, air_db, first_hz, periods, bounce_s,
         note_hz, note_db, ring_db, tear_db, boom_db) in BALLOON_POPS:
        hz = 60 + first_hz / (1 + t * first_hz / 1.6)
        swing = np.exp(-t * first_hz / periods) * np.sin(2 * np.pi * np.cumsum(hz) / SR)
        pulse = amp(air_db) * rise * swing
        delays = [bounce_s * (1 + side * BOUNCE_SKEW) for side in (-1, 1)]
        bounce = np.array([np.interp(t - delay, t, pulse) for delay in delays])
        note_level = amp(note_db - 60 * t / NOTE_T60_S) * (1 - np.exp(-t / 0.00088))
        note = note_level * np.sin(2 * np.pi * note_hz * t)
        add(air, s, pulse + BOUNCE_GAIN * bounce + note)
        add(air, s + BOOM_DELAY_S, amp(boom_db) * boom)
        crack = rise * np.exp(-(t / 0.0038) ** 2) * noise(CRACK_SPECTRUM, len(t))
        add(out, s, amp(crack_db) * crack)
        add(out, s, amp(ring_db) * (1 - np.exp(-t / 0.00067)) * underbody(len(t)))
        # the stretched rubber zips open just before the bang
        zip_hz = 3000 * rng.uniform(.85, 1.15) * (1 + .2 * drift(1500, len(lead)))
        zip_tone = np.sin(2 * np.pi * np.cumsum(zip_hz) / SR)
        tear = .8 * zip_tone + .7 * noise(CRACK_SPECTRUM, len(lead))
        add(out, s + lead[0], amp(tear_db) * np.exp(lead / .007) * tear)
    return air, out


def stereo_image(x, table):
    """Mixes a shared and an unshared part into left and right, with a phase lead by pitch."""
    f, likeness, lead = np.transpose(table)
    size = next_fast_len(N)
    hz = np.fft.rfftfreq(size, 1 / SR)
    same = np.clip(np.interp(hz, f, likeness), -1, 1)
    turn = np.exp(.5j * np.interp(hz, f, lead))
    mid, side = rfft(x, size) * np.sqrt([(1 + same) / 2, (1 - same) / 2])
    return irfft(np.array([(mid + side) * turn, (mid - side) / turn]), size)[:, :N]


# Stereo image, one for the cups and one from the balloons on; likeness and phase between left and right
# by pitch: pitch_hz, likeness (0 to 1), left_lead_rad
CUP_IMAGE = [(100, .93, 0), (300, .85, 0), (1500, .7, .1), (3000, .7, 1), (4600, .45, 1), (6600, .5, 0),
             (10300, .97, -6.28), (14000, .99, -12.57), (16000, .99, -16)]
BALLOON_IMAGE = [(100, .88, 0), (300, .75, 0), (700, .65, 0), (1400, .7, .1), (4400, .3, .9),
                 (8000, .4, 1.6), (10500, .8, 2.1), (12000, .98, 2.75), (13500, 1, 3.1)]


def scene():
    """Noises get the stereo image; drone, air pulses and thumps are added directly."""
    drone, machinery = engine()
    air, bangs = bursts()
    near = cups() + splats() + grit() + rubbing() + bangs
    sound = echoes(near + machinery) + street(near + air)
    # the stereo image changes from the cups to the balloons
    cup_side, balloon_side = stereo_image(sound, CUP_IMAGE), stereo_image(sound, BALLOON_IMAGE)
    heard = np.where(T < PART_STARTS[0], cup_side, balloon_side)
    return heard + drone + air + thumps()


EDGE_HZ = 15850


def record(dry):
    """Loud sound overloads softly; the level dips briefly between the parts; a low-pass limits the band."""
    ceiling = .95
    first_dip = np.clip((abs(T - PART_STARTS[0]) - .012) / 0.045, .02, 1)
    second_dip = np.clip((abs(T - PART_STARTS[1]) - .004) / 0.032, .02, 1)
    loud = ceiling * np.tanh(dry / ceiling) * first_dip * second_dip
    lowpass = signal.firwin(511, EDGE_HZ, window=("kaiser", 9), fs=SR)
    return signal.oaconvolve(loud, lowpass[None], "same")


dry = scene()
out = record(dry)
transcribe(out)
```